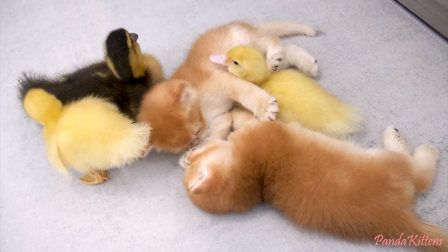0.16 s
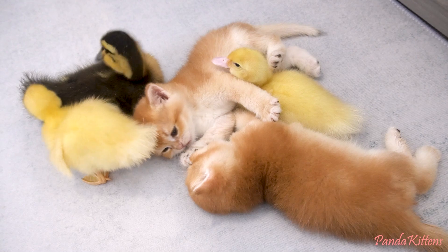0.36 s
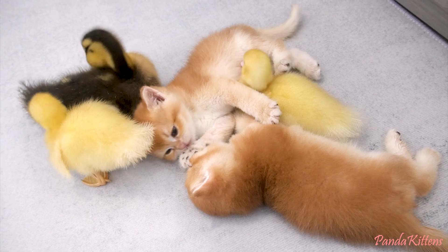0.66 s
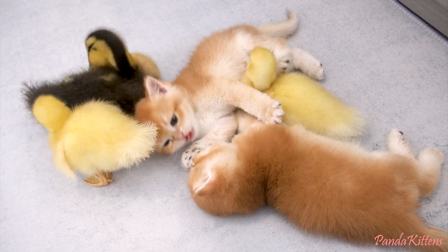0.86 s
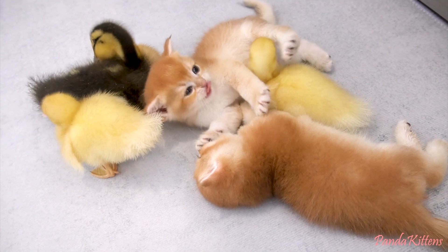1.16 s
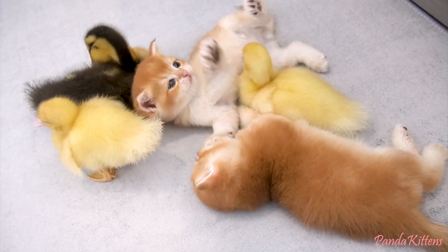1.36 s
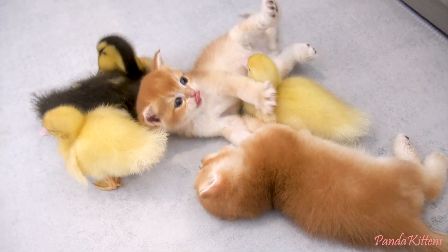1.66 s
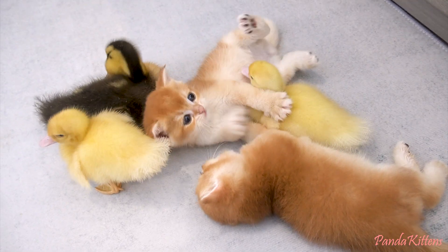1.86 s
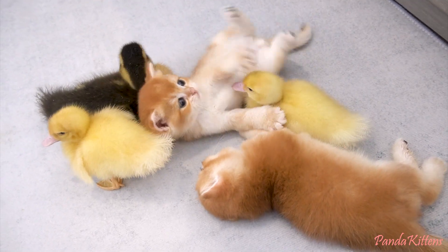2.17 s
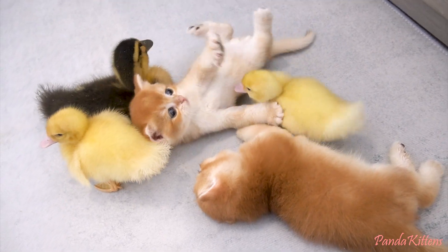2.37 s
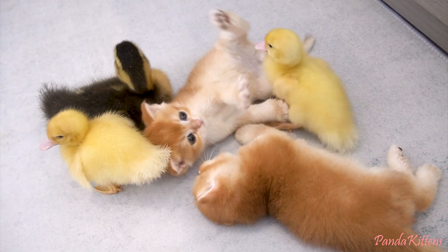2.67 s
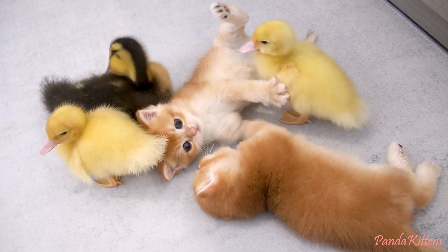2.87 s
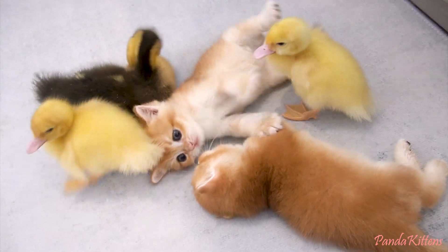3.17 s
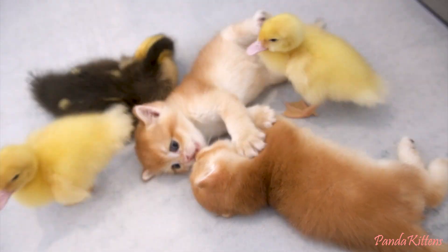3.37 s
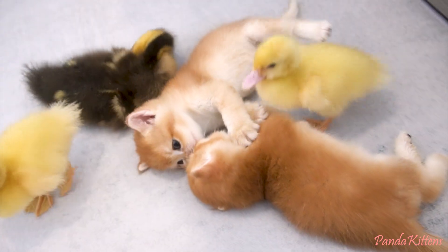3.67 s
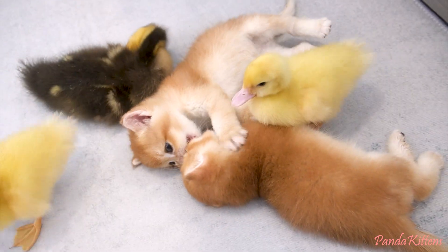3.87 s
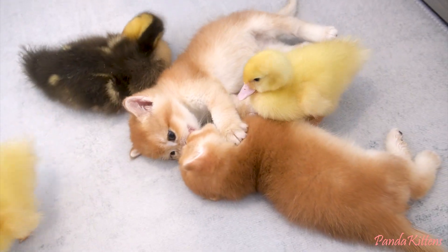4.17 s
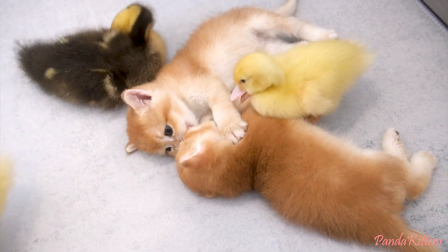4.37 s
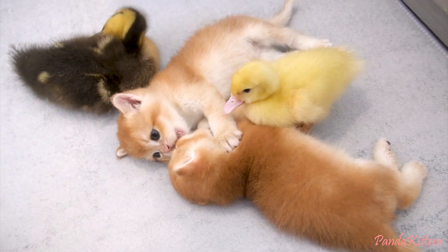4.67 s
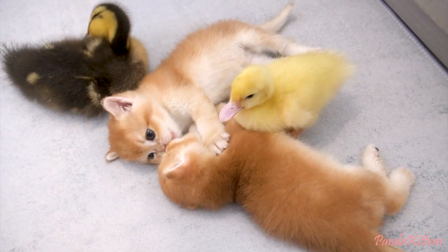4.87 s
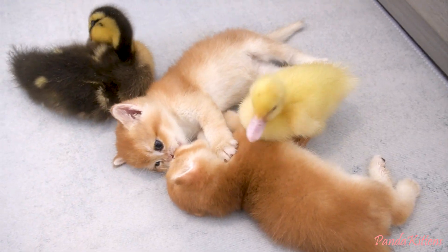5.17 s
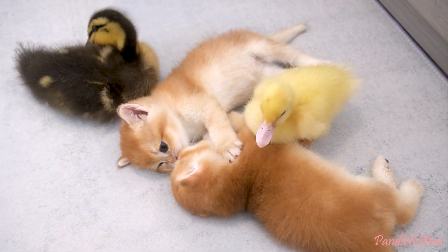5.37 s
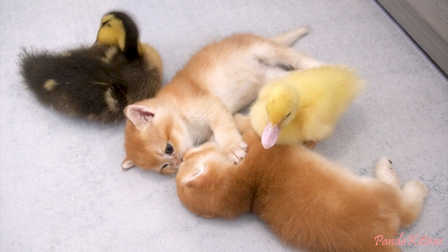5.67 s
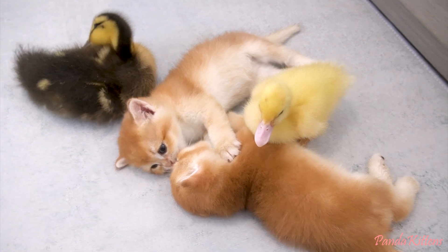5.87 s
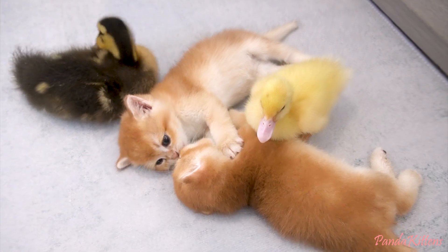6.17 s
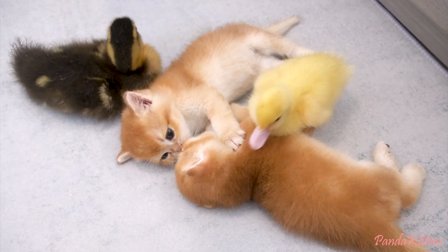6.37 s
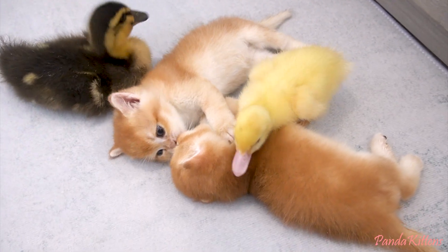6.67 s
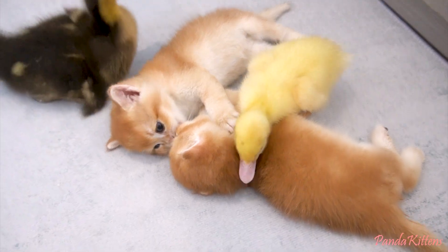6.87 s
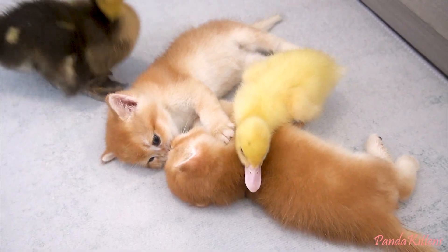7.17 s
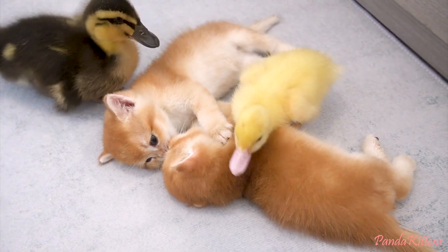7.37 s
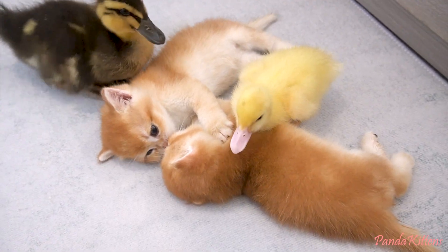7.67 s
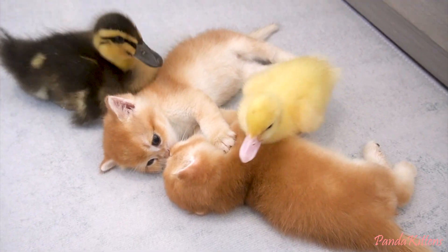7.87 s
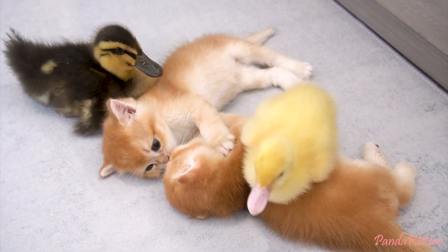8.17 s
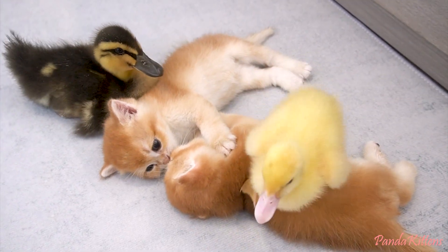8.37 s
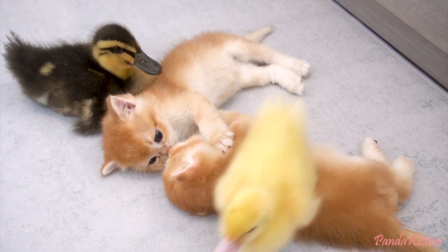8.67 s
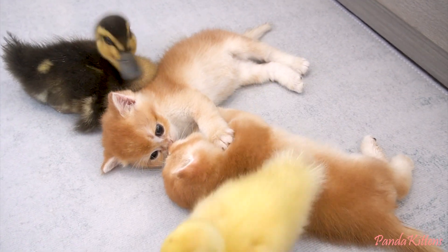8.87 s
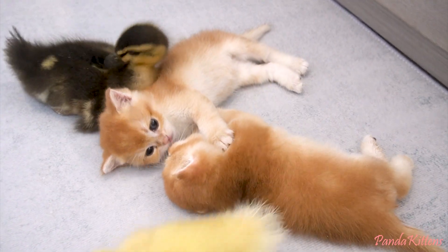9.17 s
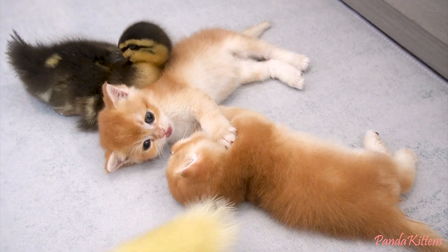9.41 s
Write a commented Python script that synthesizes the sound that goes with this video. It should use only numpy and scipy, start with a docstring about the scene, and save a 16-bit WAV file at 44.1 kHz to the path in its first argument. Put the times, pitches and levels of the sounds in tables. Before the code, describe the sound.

Two ducklings call close by indoors over a faint, steady low hum. One keeps up thin, high peeps, about five a second, and the other adds little clusters of downward chirps. About three seconds in, a kitten squeaks faintly among claw ticks and soft bumps as the peeping gets louder. The peeps then soften and pick up more room sound, and one firmer bump lands on the floor before the calls carry on to the end.

```python
"""Ducklings clamber over two kittens on the floor of a small room, close to a stereo microphone.
From the start an appliance hums and one duckling peeps evenly in arched whistles. Another soon cuts in
with falling chips, mostly in twos and threes; claws and bills tick, and down rustles on fur.
From 2.5 s feet bump the floor, and at 3 s a kitten squeaks faintly. The peeps are loudest near 4 s, then
more reverberant as the duckling turns away. A low rumble swells just before the hardest bump, at 7.3 s."""
import sys
import numpy as np
from scipy import signal
from scipy.fft import rfft, irfft
from scipy.io import wavfile

SR = 44100
rng = np.random.default_rng(int(sys.argv[2]) if len(sys.argv) > 2 else 0)


def master_out(mix):
    """Clip the mix to full scale and print it as 16-bit PCM to the path in sys.argv[1]."""
    frames = np.transpose(np.atleast_2d(mix))
    ceiling = np.clip(frames, -1, 1)
    pcm = np.round(ceiling * 32767).astype(np.int16)
    wavfile.write(sys.argv[1], SR, pcm)


N = 420713
TIME = np.arange(N) / SR
BIN_HZ = np.maximum(np.arange(N // 2 + 1) * SR / N, 1)


def undb(db):
    """Amplitude ratio of a level in decibels."""
    return 10 ** (np.asarray(db) / 20)


def unit(x):
    """Normalisation to an rms of 1."""
    return x / np.sqrt(np.mean(x ** 2))


def add(out, start, sound):
    """Superposition: a short sound joins both channels at its start time."""
    i = max(int(start * SR), 0)
    out[:, i:i + sound.shape[-1]] += sound[..., :N - i]


def read(table, at, outside=None):
    """Linear interpolation of a table's other columns along its first."""
    key, *columns = np.transpose(table)
    return np.squeeze([np.interp(at, key, column, outside, outside) for column in columns])


def over_hz(points):
    """Interpolation of (frequency, value) points on a logarithmic frequency axis."""
    hz, value = np.transpose(points)
    return np.interp(np.log(BIN_HZ), np.log(hz), value)


def peak(hz, width_hz):
    """Lorentzian resonance curve, with its full width at half height."""
    return 1 / (1 + (2 * (BIN_HZ - hz) / width_hz) ** 2)


def decay(t, t60):
    """Exponential damping: 60 dB down after t60 seconds."""
    return np.exp(-np.log(1000) * t / t60)


def noise(gain):
    """Spectral shaping: white noise with a given gain at each frequency."""
    return irfft(rfft(rng.standard_normal(N)) * gain, N)


def burst(t, centre_hz, t60):
    """A damped transient of broadband noise, uncorrelated between the ears."""
    edges_hz = [centre_hz / 1.8, min(centre_hz * 1.8, SR * .45)]
    band = signal.butter(2, edges_hz, "band", fs=SR, output="sos")
    return unit(signal.sosfilt(band, rng.standard_normal((2, len(t))))) * decay(t, t60)


def waver(t, rate_hz):
    """Random modulation: a continuous wobble with a spread near 1."""
    knots = rng.standard_normal(256)
    return np.interp(t * rate_hz, np.arange(len(knots)), knots)


def room(x, wet_db):
    """Reverberation: early reflections and a diffuse tail, on paths that vary as the animals move."""
    # floor and skirting reflections: (left delay [ms], right delay [ms], gain [dB])
    echoes = [(1.9, 2.5, -5.5), (6.3, 5.7, -6), (9.4, 10.3, -8.5), (14.2, 18, -11.5)]
    t = np.arange(SR // 2) / SR
    build_up = np.clip((t - .006) / 0.009, 0, 1)
    tail = rng.standard_normal((2, len(t))) * decay(t, t60=0.21) * build_up
    response = undb(-6.5) * unit(tail) / np.sqrt(len(t))
    for left_ms, right_ms, db in echoes:
        delay = np.array([left_ms, right_ms]) / 1000 * (1 + .03 * rng.standard_normal())
        response[[0, 1], (delay * SR).astype(int)] += undb(db)
    response *= undb(wet_db)
    response[:, 0] += 1  # the direct path
    return signal.fftconvolve(x, response, axes=1)


def air():
    """Steady room noise with the hum in it; long wavelengths reach both ears coherently."""
    # room noise: (frequency [Hz], relative spectrum level [dB])
    spectrum = [(20, -12), (45, -9), (65, 1.5), (130, 1.5), (200, -3.5), (250, -5.5), (450, -7.5),
                (850, -8.5), (1200, -13.5), (2500, -18.5), (6000, -23), (10000, -24), (15500, -27)]
    # steady peaks of the hum: (frequency [Hz], width [Hz], rise above the noise [dB])
    hum = [(84.3, 15.2, 7.5), (109, 13, 1), (542, 9.3, 1.5), (1469, 38, 0), (12200, 200, 2.5)]
    # likeness of the two ears: (frequency [Hz], correlation [ratio])
    coherence = [(60, 1), (170, 0.92), (350, 0.32), (700, 0.11), (1500, 0.034)]
    gain = undb(over_hz(spectrum) + sum(rise_db * peak(hz, width) for hz, width, rise_db in hum))
    likeness = over_hz(coherence)
    mid = noise(gain * np.sqrt(1 + likeness))
    side = noise(gain * np.sqrt(1 - likeness))
    return undb(-54) * unit(np.array([mid + side, mid - side]))


def appliance_drone():
    """Narrowband noise beats within itself, so the appliance's low note wavers; it also swells once."""
    # bands of the note: (frequency [Hz], width [Hz])
    bands = [(165, 9.8), (182, 12)]
    # its envelope: (time [s], level [dB])
    envelope = [(0.0, -62), (4.02, -59.5), (4.2, -50), (4.5, -63.5), (9.5, -61.5)]
    note = unit(noise(sum(peak(hz, width) for hz, width in bands)))
    return note * undb(read(envelope, TIME))


def rumble():
    """Amplitude modulation of bass noise: one soft swell, the same at both ears."""
    # the swell: (time [s], level [dB])
    envelope = [(6.55, -75), (6.67, -57), (7.0, -62), (7.15, -73)]
    return unit(noise(peak(hz=79, width_hz=30))) * undb(read(envelope, TIME, outside=-np.inf))


def scrabbling():
    """Impact and friction: claws and bills tick, and down brushes grainily against fur."""
    # small impacts: (time [s], level [dB], centre frequency [Hz])
    ticks = [(0.076, -54, 8000), (1.138, -51, 3000), (1.223, -47, 7900), (2.11, -49, 10000),
             (2.894, -45, 12000), (3.209, -35, 6300), (3.389, -42, 10000), (3.443, -39, 7000),
             (5.871, -46, 6000), (6.951, -49, 4700), (7.131, -46, 1500), (8.013, -45.5, 2960),
             (8.429, -52, 10000), (9.189, -47, 8970)]
    # envelope of the brushing: (time [s], level [dB])
    rustle = [(1.06, -71), (1.14, -56.5), (1.19, -65), (1.235, -57.5), (1.3, -66)]
    # its spectrum: (frequency [Hz], gain [dB])
    colour = [(500, -2), (1200, 5), (6000, 2), (11000, -2), (12500, 2), (13700, -9)]
    out, t = np.zeros((2, N)), np.arange(SR // 20) / SR
    for start, db, hz in ticks:
        add(out, start, undb(db) * burst(t, hz, t60=0.025))
    grain_db = 3.5 * np.repeat(rng.standard_normal(N // 128 + 1), 128)[:N]
    brush = np.array([unit(noise(undb(over_hz(colour)))) for _ in range(2)])
    return out + brush * undb(read(rustle, TIME, outside=-np.inf) + grain_db)


def bumps():
    """Modal vibration: feet and bodies ring the floor briefly, with a thud and a scuff on contact."""
    # soft blows: (time [s], level [dB], brightness [dB])
    blows = [(2.555, -48, 3.5), (2.857, -52, -10), (3.21, -55, 9), (3.446, -53.5, 1), (6.714, -51.5, -12),
             (7.277, -38, -18), (7.845, -55, -5)]
    # floor resonances: (frequency [Hz], relative level [dB], t60 [s])
    modes = [(299, 8, 0.033), (454, 3, 0.063), (572, 4.5, 0.092), (694, 4.5, 0.033), (914, -1, 0.058)]
    out, t = np.zeros((2, N)), np.arange(SR // 5) / SR
    attack = np.minimum(t / 0.0044, 1)
    for start, db, bright_db in blows:
        ring = sum(undb(mode_db) * np.sin(2 * np.pi * (hz * t + rng.random())) * decay(t, t60)
                   for hz, mode_db, t60 in modes)
        thud = 1.13 * burst(t, centre_hz=380, t60=0.11)
        scuff = undb(bright_db - 1.5) * burst(t, centre_hz=1850, t60=0.092)
        add(out, start, undb(db) * (ring + thud + scuff) * attack)
    return out


def kitten():
    """Phonation with pitch jitter and noise: tiny hoarse squeaks, close by and to the right."""
    # (time [s], length [s], start pitch [Hz], end pitch [Hz], level [dB], second harmonic [dB])
    squeaks = [(3.046, 0.04, 1200, 1635, -41, -12), (3.153, 0.028, 920, 1227, -49.5, -2),
               (3.31, 0.022, 1150, 1590, -49, -17), (3.442, 0.0075, 1264, 1220, -43, -33)]
    out, ears_db = np.zeros((2, N)), np.array([[-2.5], [3.5]])
    for start, length, from_hz, to_hz, db, second_db in squeaks:
        t = np.arange(int(length * SR)) / SR
        glide_hz = from_hz + (to_hz - from_hz) * t / length
        hz = glide_hz * (1 + 0.031 * waver(t, rate_hz=877))
        phase = 2 * np.pi * np.cumsum(hz) / SR
        voice = np.sin(phase) + undb(second_db) * np.sin(2 * phase) + .5 * burst(t, 1650, t60=0.24)
        envelope = np.sqrt(np.sin(np.pi * t / length))
        add(out, start, voice * envelope * undb(db + ears_db))
    return out


def swell(share, peak_share, swell_db, fade_db):
    """A call's envelope in dB: a parabolic rise to a peak, then a linear fade."""
    rise = np.maximum(1 - share / peak_share, 0) ** 2
    fall = np.maximum(share - peak_share, 0) / (1 - peak_share)
    return -swell_db * rise - fade_db * fall


def whistle(pitch_hz, drive_db, second_db, pan_db, lag_ms, upper_db, jitter, attack_s):
    """Source and filter: the syrinx makes a nearly pure tone; throat and bill colour its overtones."""
    # response of throat and bill: (frequency [Hz], gain [dB])
    throat = [(6000, -15), (7400, 5.5), (8400, 0), (9500, -8.5), (11000, 4), (12700, -1.5), (14000, -6.5),
              (15300, -4)]
    t = np.arange(len(pitch_hz)) / SR
    length = t[-1]
    bill_db = -5 * np.exp(-t / length / 0.18)  # the overtones come in as the bill opens
    fray = 0.36 + 1.2 * t / length  # jitter and flutter grow through the call
    hz = pitch_hz * (1 + jitter * fray * waver(t, rate_hz=894))
    lag_cycles = np.outer([0, 1], hz) * lag_ms / 1000  # the far ear hears it later
    phase = 2 * np.pi * (np.cumsum(hz) / SR - lag_cycles)
    tone = np.sin(phase)
    # the third and fourth harmonics glint only where the call is driven hardest
    for k, db in [(2, second_db), (3, upper_db + drive_db), (4, upper_db + 2 + drive_db / 2)]:
        gain = undb(db + bill_db + read(throat, k * hz))
        tone += gain * np.sin(k * phase) * (k * hz < SR / 2)
    edges = np.clip(np.minimum(t / attack_s, (length - t) / 0.0025), 0, 1)
    flutter_db = 3 * fray * waver(t, rate_hz=302)
    ears_db = np.array([[pan_db], [-pan_db]]) / 2
    return unit(tone * edges * undb(drive_db)) * undb(flutter_db + ears_db)


def chipping_duckling():
    """Downward frequency sweeps toward one low note: the higher a chip starts, the longer it lasts."""
    # falling calls: (time [s], start pitch [Hz], relative level [dB])
    chips = [(0.674, 4004, -43.5), (.752, 4630, -39.5), (.848, 4620, -41), (2.771, 4710, -40.5),
             (2.86, 4710, -40), (2.959, 4490, -40), (3.402, 4460, -43.5), (4.026, 4910, -42),
             (4.113, 4670, -39.5), (4.216, 4900, -41.5), (4.787, 4140, -46), (4.862, 4820, -39.5),
             (4.952, 5060, -39.5), (5.667, 4090, -46.5), (5.747, 4750, -40), (5.835, 4990, -39.5),
             (5.938, 5040, -39.5), (6.126, 4610, -41), (6.604, 4460, -42.5), (8.396, 4660, -39),
             (8.476, 4730, -37.5), (8.557, 5050, -38), (8.656, 4674, -37.5), (8.863, 4720, -37.5),
             (8.941, 5170, -36), (9.126, 4880, -40.5), (9.207, 5210, -36), (9.381, 5410, -38),
             (9.47, 5250, -39.5)]
    # the duckling wanders across: (time [s], second harmonic at source [dB], left minus right [dB])
    wandering = [(.7, -27.5, -0.5), (2.8, -26.5, -3), (4.2, -20, -2), (5.9, -21.5, -2), (8.5, -26, -2),
                 (9.4, -20, 2.5)]
    low_hz, fall_hz_per_s = 2828, 71000
    out = np.zeros((2, N))
    for start, top_hz, db in chips:
        span_hz = top_hz - low_hz
        share = np.linspace(0, 1, int(span_hz / fall_hz_per_s * SR))
        second_db, pan_db = read(wandering, start)
        hz = low_hz + span_hz * np.exp(-2.1 * share ** 1.4)
        drive_db = swell(share, peak_share=0.31, swell_db=10.5, fade_db=15.5)
        call = whistle(hz, drive_db, second_db, pan_db,
                       lag_ms=0, upper_db=-28.5, jitter=0.022, attack_s=0.0037)
        add(out, start, room(undb(db + 1.5) * call, wet_db=-1.5))
    return out


def peeping_duckling():
    """Arched contact peeps whose direct-to-reverberant ratio falls as the duckling turns away."""
    # about 5.5 calls a second: (time [s], length [s], top pitch [Hz], level [dB])
    peeps = [(.057, 0.035, 3916, -45), (0.144, 0.045, 3980, -41), (.422, 0.033, 3774, -43),
             (0.503, 0.04, 3876, -38), (.743, 0.03, 3700, -41), (1.032, 0.044, 3560, -41.5),
             (1.115, 0.046, 3997, -39.5), (1.317, 0.05, 3804, -48.5), (1.526, 0.049, 3807, -44.5),
             (1.721, .049, 3830, -43.5), (1.913, 0.057, 3860, -43.5), (2.105, 0.057, 3930, -42.5),
             (2.291, 0.055, 3960, -43), (2.474, 0.065, 4025, -44.5), (2.658, 0.057, 4004, -41.5),
             (2.843, .053, 4030, -38), (3.022, 0.064, 4050, -35.5), (3.204, 0.063, 4100, -34),
             (3.383, 0.061, 4215, -29.5), (3.558, 0.059, 4307, -28.5), (3.739, 0.061, 4220, -28.5),
             (3.916, 0.054, 4217, -29), (4.097, 0.051, 4446, -28), (4.281, 0.058, 4220, -33.5),
             (4.455, 0.052, 4286, -29.5), (4.631, 0.059, 4324, -32.5), (4.809, .056, 4223, -34.5),
             (4.999, 0.044, 4334, -31.5), (5.173, 0.06, 4323, -36), (5.351, 0.067, 4290, -39.5),
             (5.529, .044, 4480, -31), (5.703, 0.044, 4424, -31), (5.88, .054, 4440, -34),
             (6.064, 0.055, 4416, -33.5), (6.249, .048, 4434, -32), (6.438, 0.054, 4335, -35),
             (6.623, 0.059, 4375, -37), (6.805, 0.059, 4280, -41.5), (6.982, 0.042, 4420, -34.5),
             (7.168, 0.055, 4320, -41), (7.35, 0.051, 4344, -43.5), (7.531, 0.061, 4330, -43.5),
             (7.713, 0.062, 4260, -44), (7.892, 0.07, 4320, -43), (8.072, .067, 4170, -42),
             (8.249, 0.066, 4333, -42), (8.426, 0.063, 4350, -37), (8.61, 0.057, 4314, -37),
             (8.799, 0.061, 4250, -39.5), (8.989, 0.055, 4210, -36.5), (9.186, 0.072, 4230, -37.5),
             (9.38, 0.06, 4324, -37)]
    # from easy to pressed; the lowest peeps rasp, the highest swell most:
    # (top pitch [Hz], opening scoop [share of pitch], swell [dB], fade [dB], jitter [share of pitch])
    effort = [(3610, 0.089, 9, 4.5, 0.047), (3820, 0.157, 2.5, 10, 0.0041), (4110, 0.052, 18, 17, 0.0083)]
    # louder peeps hold the top note longer: (level [dB], hold [share of length], peak [share of length])
    holding = [(-42, 0.2014, .3), (-30, 0.318, .37)]
    # the duckling turns and walks off: (time [s], reflection gain [dB],
    # second harmonic at source [dB], left minus right [dB], right ear lag [ms])
    turning = [(.5, 1, -27, 1.5, 0.33), (1.05, -0.5, -15.5, -1, 0.32), (2.55, -1.5, -13.5, 1, 0.31),
               (3.4, -2.5, -24, 1.5, .28), (4.7, -0.5, -22.5, 2.5, 0.32), (5.4, 6.5, -20, .5, 0.33),
               (6.4, 6.5, -23, 1.5, 0.271), (7.1, 8, -22, 2.5, 0.28), (7.8, 11, -25.5, 0.5, 0.23),
               (9.4, 4.5, -26.5, 2, 0.33)]
    out = np.zeros((2, N))
    for start, length, top_hz, db in peeps:
        share = np.linspace(0, 1, int(length * SR))
        scoop_depth, swell_db, fade_db, jitter = read(effort, top_hz)
        hold_share, peak_share = read(holding, db)
        wet_db, second_db, pan_db, lag_ms = read(turning, start)
        # the pitch snaps up to the top note, holds it, then slides down
        scoop = scoop_depth * np.exp(-share * length / .0028)
        slide = np.maximum(share - hold_share, 0) / (1 - hold_share)
        hz = top_hz * (1 - scoop - .215 * slide ** 1.047)
        drive_db = swell(share, peak_share, swell_db, fade_db)
        call = whistle(hz, drive_db, second_db, pan_db, lag_ms,
                       upper_db=-32.5, jitter=jitter, attack_s=0.0005)
        direct_db = db - 0.47 * wet_db  # the direct sound weakens as the room gains on it
        add(out, start, room(undb(direct_db) * call, wet_db))
    return out


def scene():
    """Superposition of the animals, their reflections and the room's background."""
    huddle = room(kitten() + bumps() + scrabbling(), wet_db=-3.5)[:, :N]
    return peeping_duckling() + chipping_duckling() + huddle + air() + appliance_drone() + rumble()


def record(dry):
    """Band limiting: the recorder's steep low-pass filter cuts the top."""
    top_hz = 15850
    return signal.sosfilt(signal.ellip(10, .2, 70, top_hz, fs=SR, output="sos"), dry)


dry = scene()
out = record(dry)
master_out(out)
```